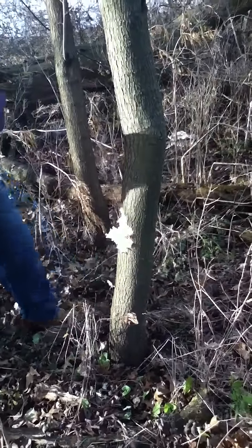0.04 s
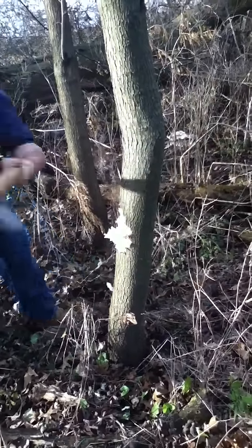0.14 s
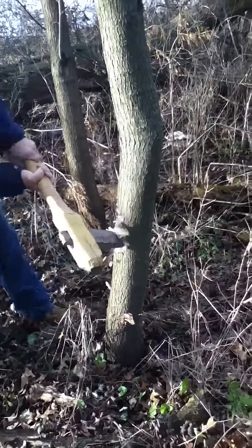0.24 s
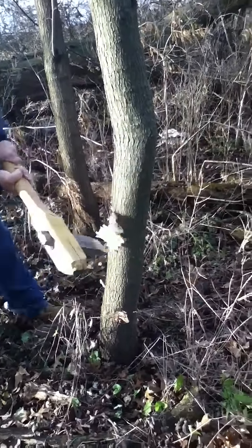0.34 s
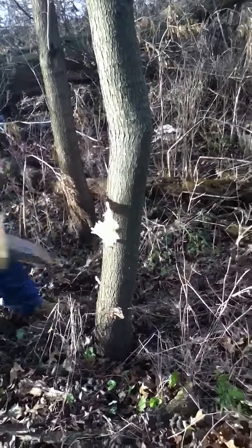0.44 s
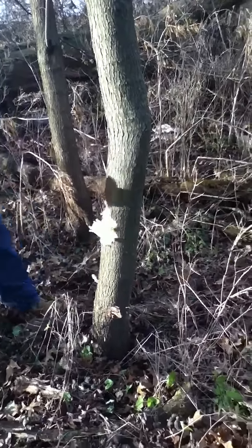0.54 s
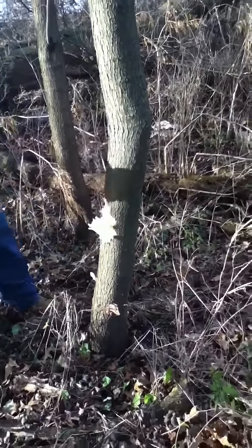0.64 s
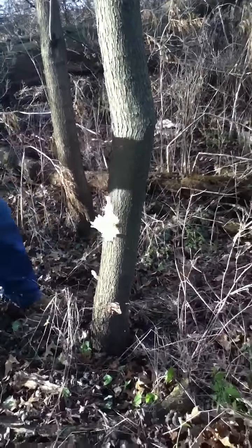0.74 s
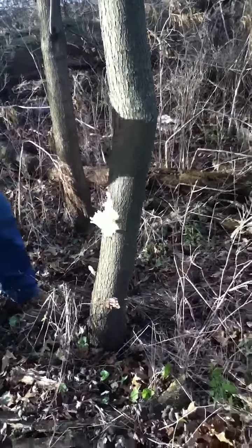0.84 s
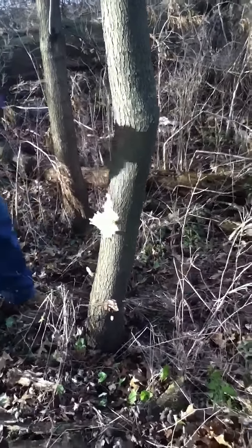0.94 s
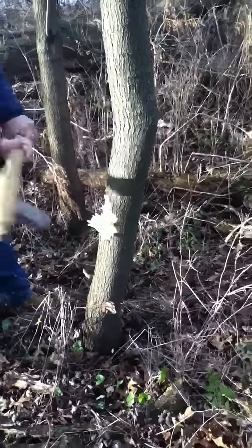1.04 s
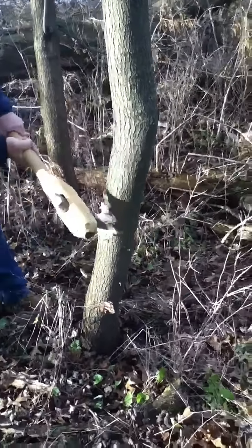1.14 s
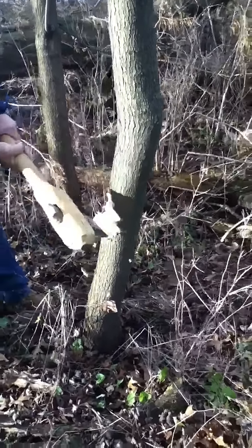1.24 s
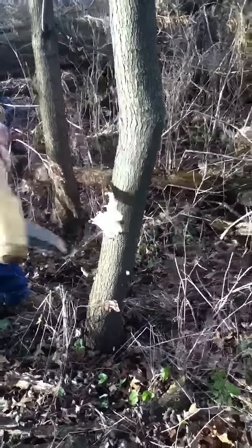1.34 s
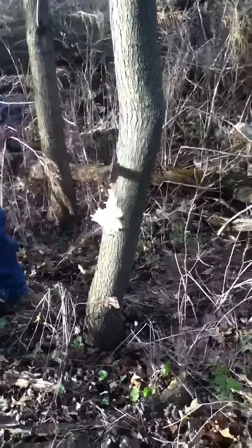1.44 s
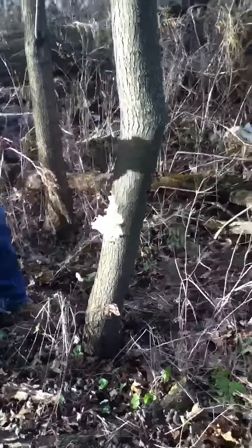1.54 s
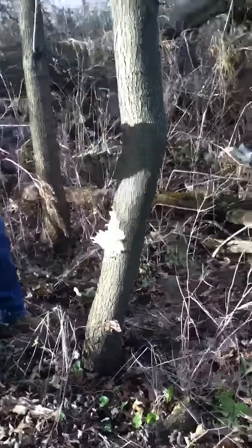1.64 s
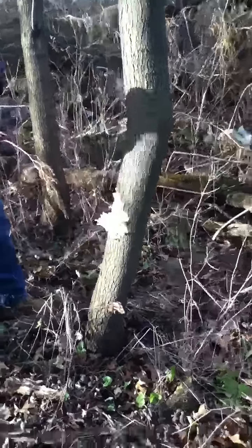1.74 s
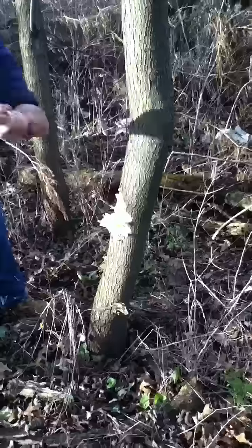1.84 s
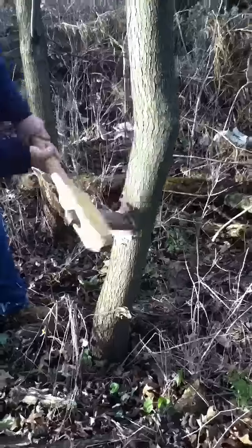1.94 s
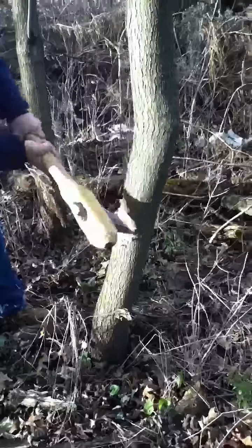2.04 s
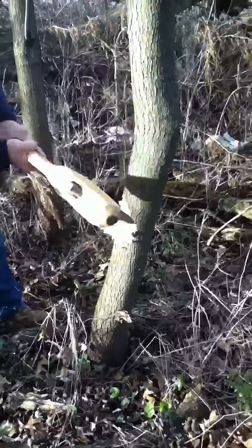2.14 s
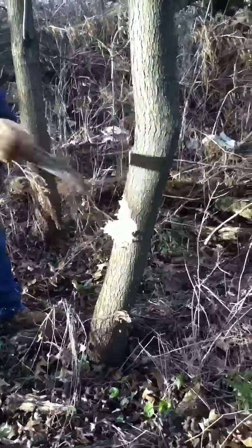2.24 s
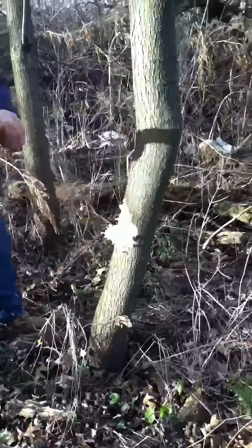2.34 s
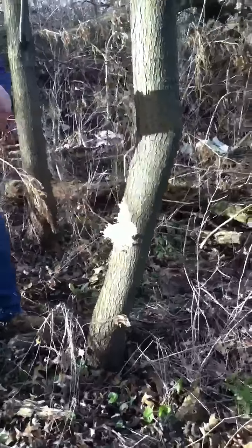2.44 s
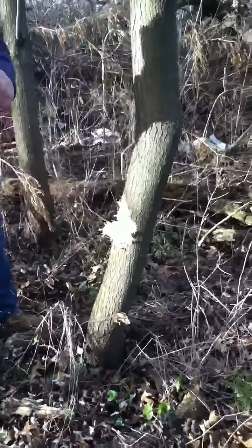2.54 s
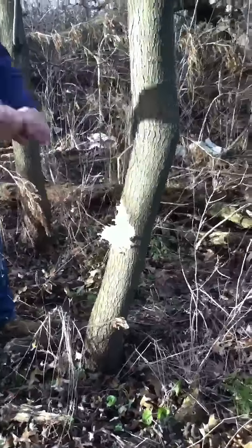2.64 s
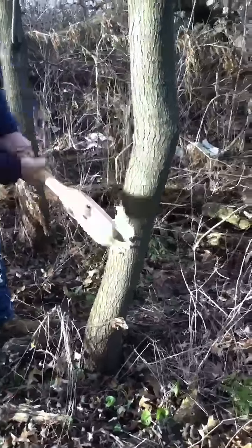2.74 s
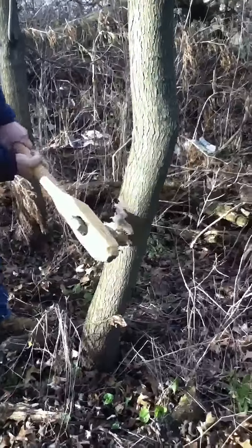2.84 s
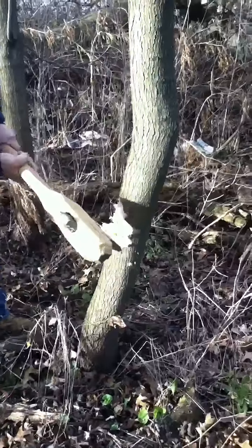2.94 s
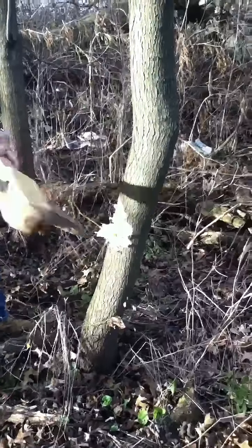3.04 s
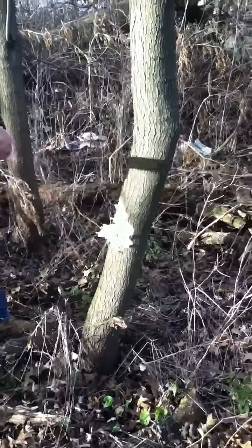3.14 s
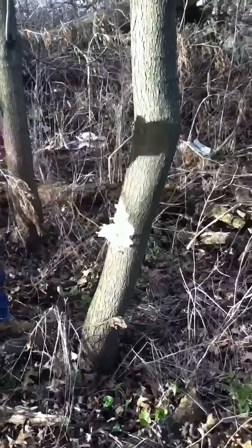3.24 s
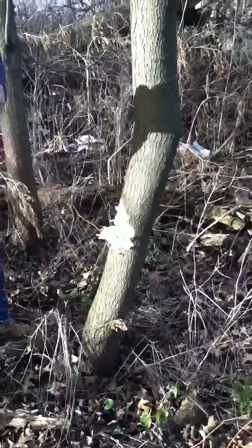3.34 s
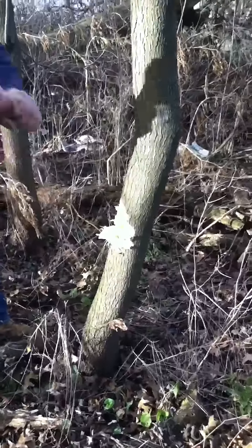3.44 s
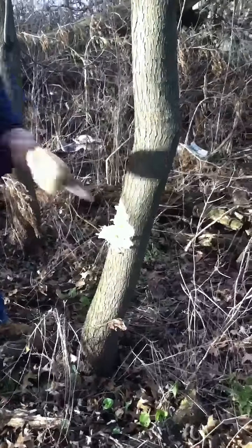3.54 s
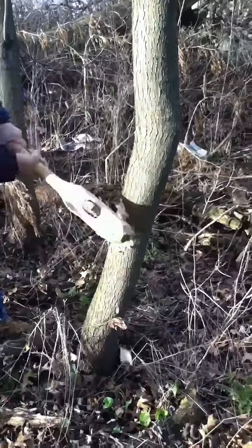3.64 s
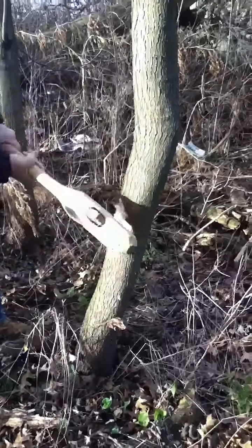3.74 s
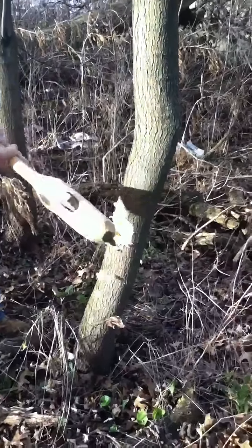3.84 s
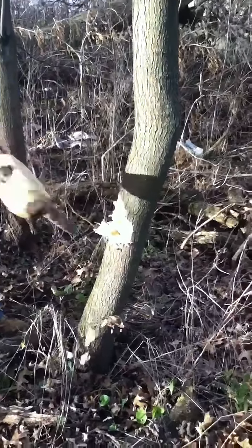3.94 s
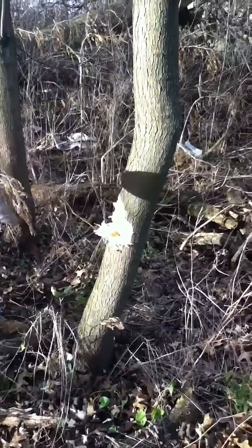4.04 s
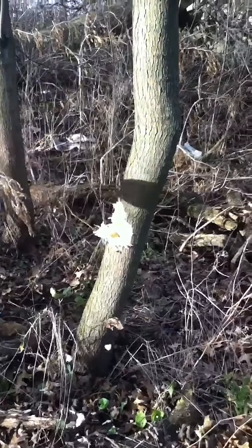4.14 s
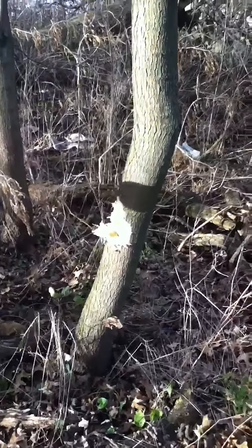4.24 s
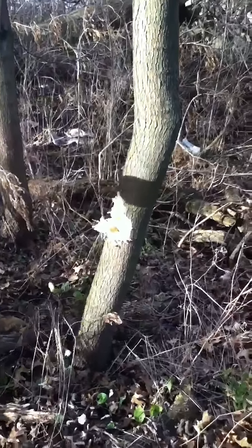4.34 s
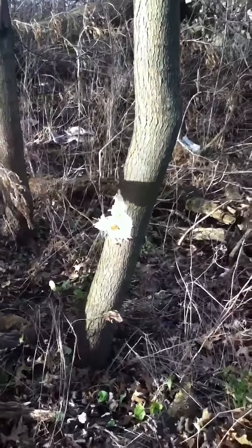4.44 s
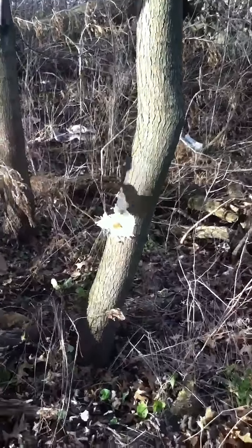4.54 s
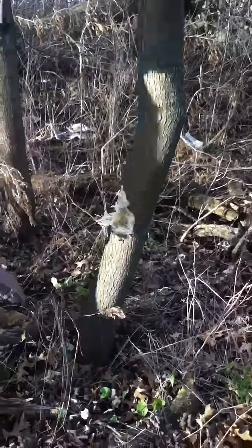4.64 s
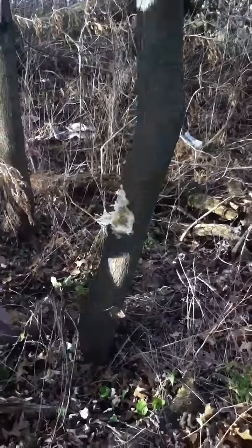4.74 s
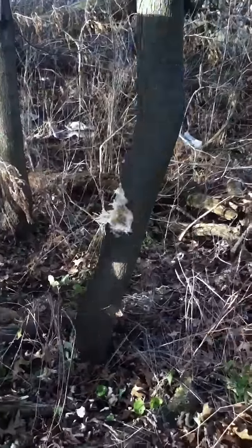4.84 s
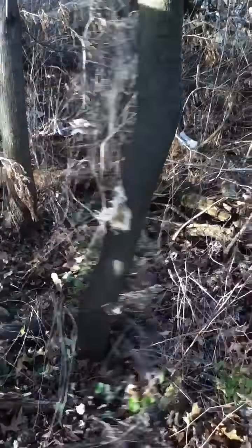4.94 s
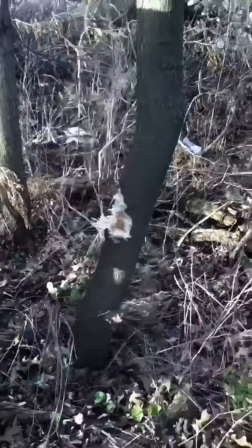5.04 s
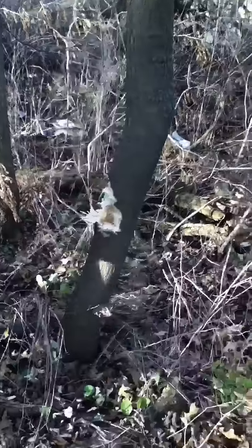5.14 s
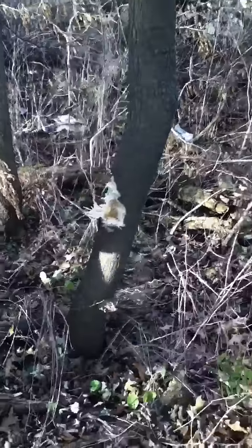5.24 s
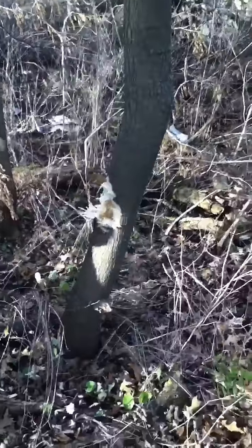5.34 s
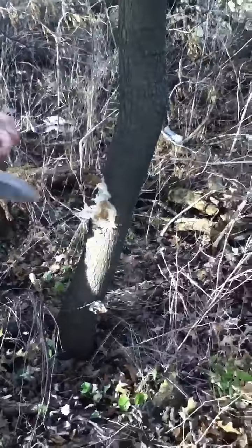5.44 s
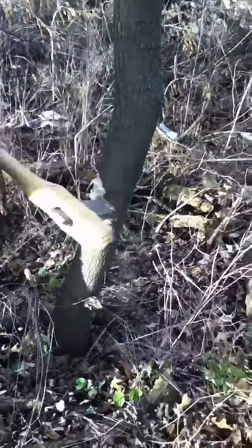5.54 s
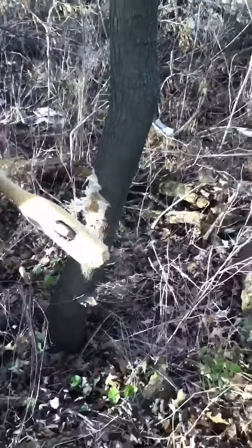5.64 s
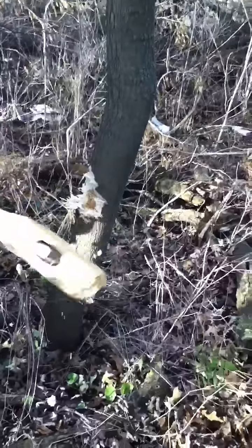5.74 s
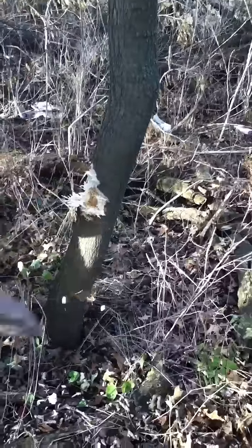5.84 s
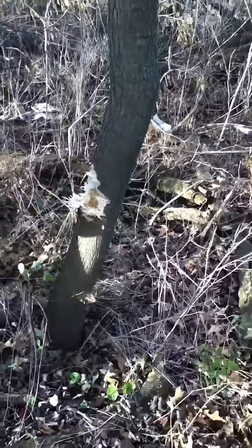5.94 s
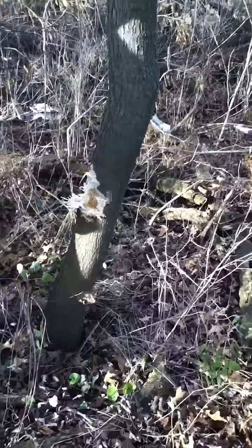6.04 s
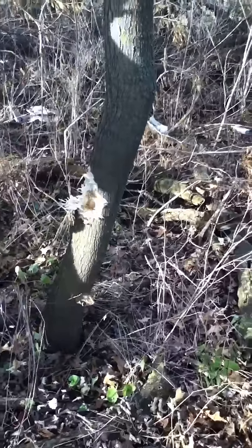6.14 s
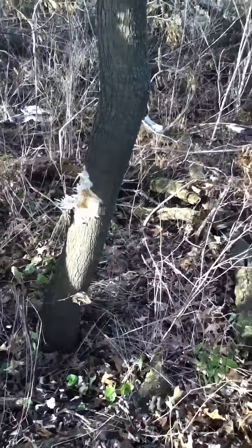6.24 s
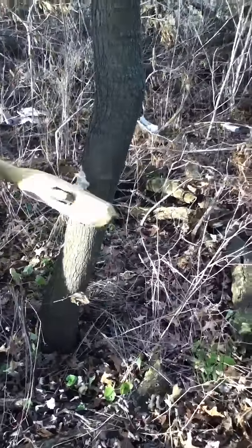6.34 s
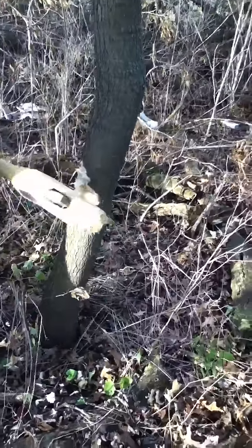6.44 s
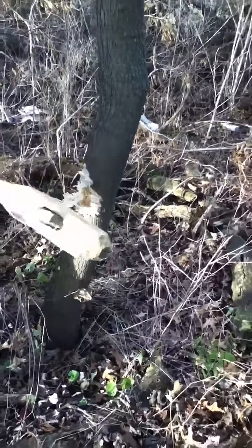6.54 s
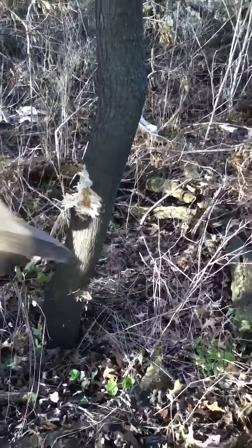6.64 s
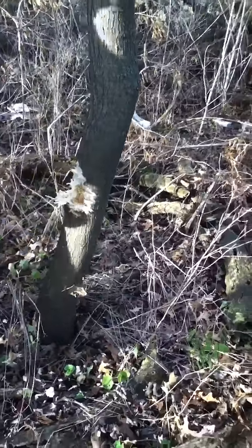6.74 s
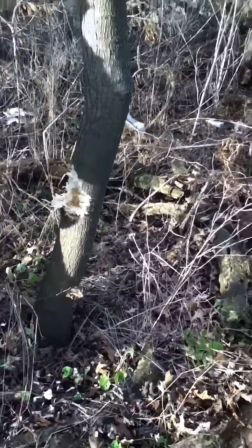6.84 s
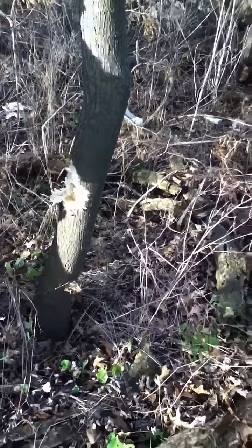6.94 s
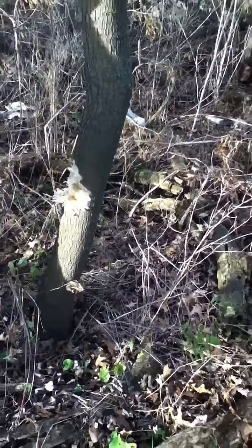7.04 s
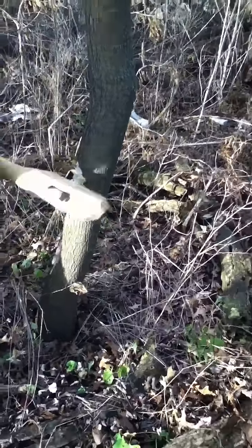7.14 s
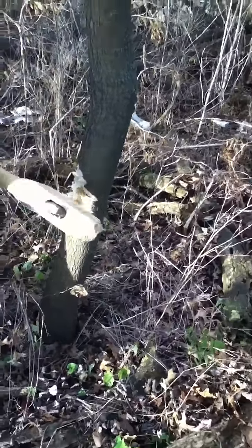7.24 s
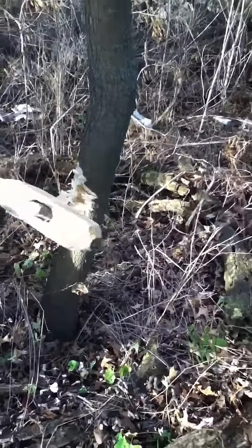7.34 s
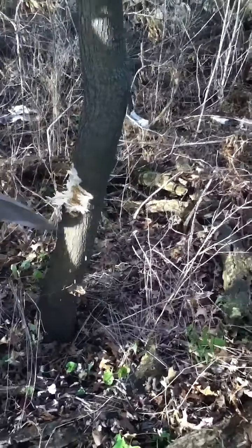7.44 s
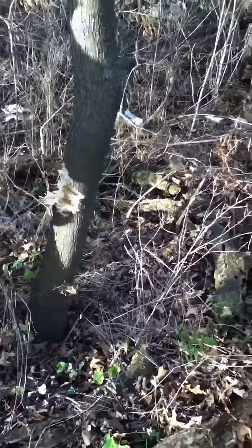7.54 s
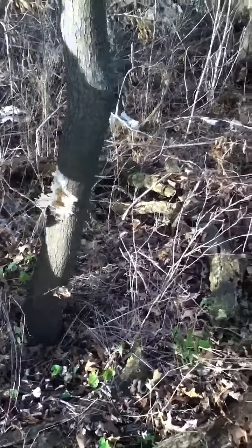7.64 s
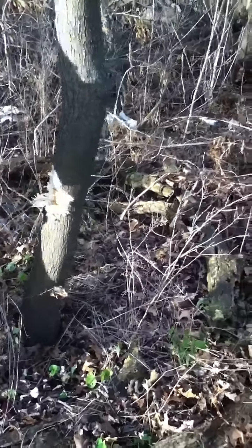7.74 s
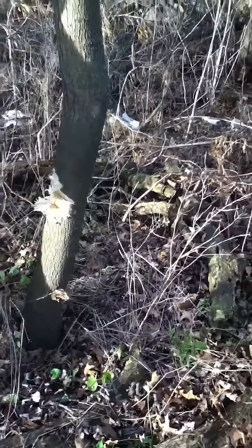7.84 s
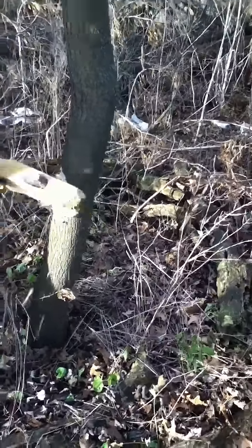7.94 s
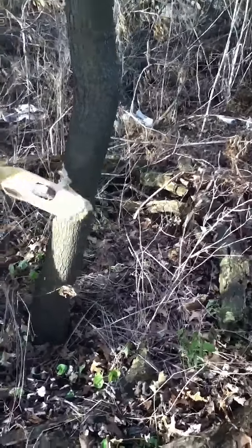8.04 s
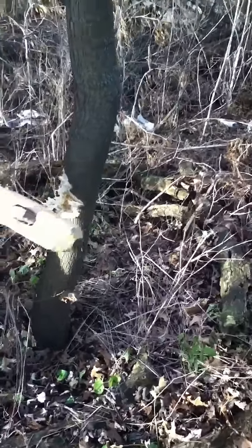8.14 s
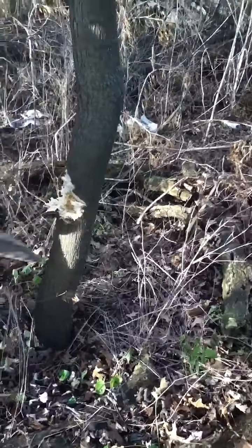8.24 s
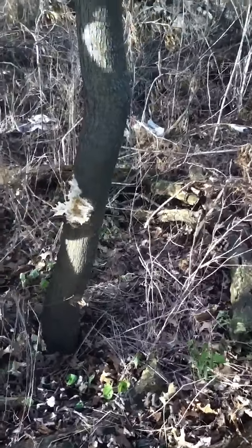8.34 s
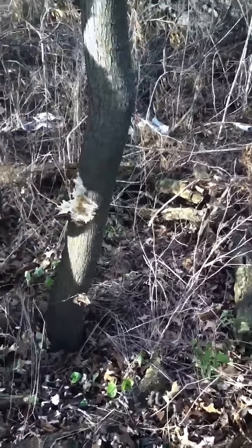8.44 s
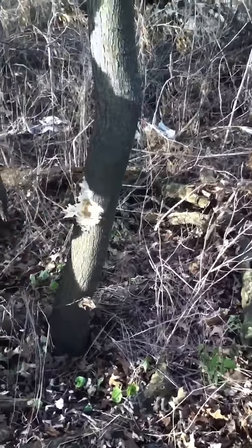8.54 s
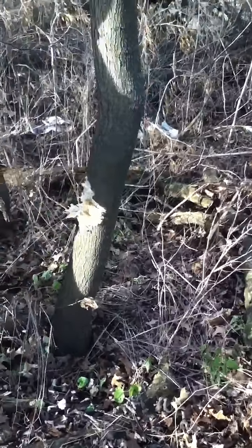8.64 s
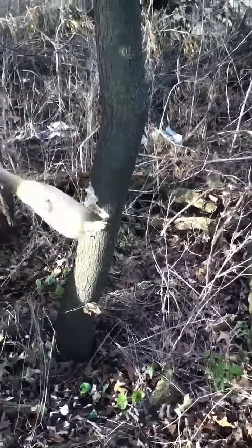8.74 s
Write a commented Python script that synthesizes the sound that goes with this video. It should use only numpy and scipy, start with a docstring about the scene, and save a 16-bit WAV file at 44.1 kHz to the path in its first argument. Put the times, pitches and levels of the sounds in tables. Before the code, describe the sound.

A stone axe strikes a slim living tree a couple of metres away in still woodland. Five sharp, dead knocks come a little faster than one a second, each with a crunch of fibres and a faint echo. In a short pause there is a rustling swish, a twig snap and a soft boot thud, then four more blows follow. Chips patter lightly into dry leaves.

```python
"""A smooth, finely crackling rustle swishes in still winter woodland air as a chopper moves; boots thud.
A couple of metres away, his stone axe in a wooden haft strikes a slim living trunk nine times.
Each impact excites heavily damped modes, a dead knock, while fibres crunch and the trunk shudders.
The trees around reflect faint echoes, and faint woody pings and taps come mostly just after the blows.
Chips patter into the leaf litter, twigs snap underfoot, and a limiter holds the peaks."""
import sys
import numpy as np
from scipy import signal
from scipy.fft import rfft, irfft, next_fast_len
from scipy.io import wavfile
from scipy.ndimage import uniform_filter1d, minimum_filter1d

SR = 44100
rng = np.random.default_rng(int(sys.argv[2]) if len(sys.argv) > 2 else 0)


def persist_wave(psi):
    """Save psi, clipped to +-1, as 16-bit WAV."""
    counts = np.round(np.clip(psi, -1, 1) * 32767).astype(np.int16)
    wavfile.write(sys.argv[1], SR, np.atleast_2d(counts).T)


N = 387198

# axe blows: start_s, three knock modes (pitch_hz, level_db, cycles_to_peak),
# hollow note (pitch_hz, level_db), second bite (lag_ms, gain_db), crunch (level_db, centre_ms, spread_ms),
# stone modes (low_mode_db, high_mode_db), shudder_gain_db
BLOWS = [(0.3617, [(690, -4, 0.44), (944, -22, 2.6), (1460, 12, 0.56)], (247, -25.5), (1.92, -20.5),
         (-18.5, 0.78, 1.75), (-40, -32), 1.5), (1.214, [(656, -16.5, 0.39), (905, -15.5, .6),
         (1516, -7.7, 0.83)], (221, -25.5), (1.177, 4), (-24.5, 1.95, 1.9), (-36.5, -27.5), -1),
         (2.059, [(530, -9, 0.37), (800, -9, 0.64), (1540, -2.5, 0.48)], (200, -27.5), (1.94, -14.7),
         (-22, 1.5, 2.8), (-43, -34), 2), (2.8834, [(634, -10.5, 0.63), (1360, -8, 2), (1946, -12, 2.2)],
         (244, -19), (1.8, -2.5), (-19, -0.43, 2.4), (-22, -24), 4.5), (3.7111, [(824, -14, 0.61),
         (1273, -15, 2.2), (1796, -13.5, 2.7)], (220, -24.5), (1.87, -9.5), (-19, 2.2, 3), (-23, -18),
         -5.5), (5.6511, [(472, -17, 0.9), (787, -12.5, 2), (1310, -10, 1.4)], (205, -22), (1.93, 4.3),
         (-15, 2, 2), (-27, -4), 4.5), (6.47, [(508, -14, 1.1), (866, 1.5, 0.56), (1452, -7, 1.03)],
         (204, -22), (2.57, -10), (-22, 4.3, 2.3), (-15, -1.2), 6.5), (7.2666, [(406, -7, 0.35),
         (895, 0.5, 0.89), (1260, -1, 0.7)], (220, -22.5), (1.5, -7.5), (-25.5, 2.9, 2.1), (-21, -14), 4),
         (8.0519, [(465, 2, 0.45), (990, -2, 0.82), (1460, -6.5, 1.06)], (239, -19), (1.39, -6.5),
         (-19.5, 4, 2.9), (-19, -7.5), 1.5)]


def undb(db):
    """Decibels to amplitude ratio."""
    return 10 ** (np.asarray(db) / 20)


def unit(x):
    """Normalise to rms 1."""
    return x / np.sqrt(np.mean(x ** 2))


def peak(x, db):
    """Normalise to a given peak level."""
    return undb(db) * x / np.max(np.abs(x))


def add(out, at, sound):
    """Superpose a sound from a given second on."""
    i = max(int(at * SR), 0)
    out[i:i + len(sound)] += sound[:max(len(out) - i, 0)]


def colour(x, points):
    """Minimum-phase filter through (frequency_hz, gain_db) points."""
    size = next_fast_len(len(x) + 4096)
    hz, db = np.transpose(points)
    bin_hz = np.arange(size // 2 + 1) * SR / size
    log_gain = np.log(undb(np.interp(np.log(bin_hz + 1), np.log(hz), db)))
    cepstrum = irfft(log_gain, size)
    cepstrum[1:size // 2] *= 2  # folding the cepstrum makes the filter causal
    cepstrum[size // 2 + 1:] = 0
    return irfft(rfft(x, size) * np.exp(rfft(cepstrum)), size)[:len(x)]


def noise(points, size):
    """Filtered Gaussian noise of rms 1."""
    return unit(colour(rng.standard_normal(size), points))


def drift(rate_hz):
    """Linearly interpolated random values of rms 1."""
    hold = max(int(SR / rate_hz), 1)
    stairs = np.repeat(rng.standard_normal(N // hold + 1), hold)
    return unit(uniform_filter1d(stairs, hold)[:N])


def swell(t, peak_s):
    """Critically damped envelope: rises from t = 0 to 1 at peak_s, then decays."""
    u = np.maximum(t, 0) / peak_s
    return u * np.exp(1 - u)


def ring(t, modes):
    """Superposition of damped modes (pitch_hz, level_db, peak_s), neighbours in opposite polarity."""
    return sum((-1) ** k * undb(db) * swell(t, peak_s) * np.sin(2 * np.pi * hz * t)
               for k, (hz, db, peak_s) in enumerate(modes))


def air(hiss_db=-61, waver_db=1.2, rumble_db=-65.5, gust_db=3):
    """Amplitude-modulated noise: a soft, nearly even hiss over an unsteady low rumble."""
    # spectrum of still woodland air: frequency_hz, gain_db
    hiss_spectrum = [(25, -36), (76, 7), (157, 0.5), (405, -6), (1500, -10), (2220, -10), (3160, -25),
                     (16000, -41.5)]
    rumble = noise([(25, 4.0), (70, 1.0), (130, -17.0), (300, -25.0), (2000, -38.5)], N)
    hiss = undb(hiss_db + waver_db * drift(1.2)) * noise(hiss_spectrum, N)
    return hiss + undb(rumble_db + gust_db * drift(11)) * rumble


def rustle_envelope(body=False, rest_db=-56, blow_db=-52.5, blow_peak_s=0.059, edge_db=9, roundness=1.49):
    """Incoherent sounds add in power: a resting level, a swell at each blow and one at each movement."""
    # swishes as the chopper moves: centre_s, level_db, rise_s, fall_s, body_gain_db
    swishes = [(0.116, -25.5, 0.072, 0.062, -0.5), (0.329, -45.5, 0.11, 0.096, -1),
               (0.957, -46, 0.28, 0.047, 5), (1.053, -44, 0.078, 0.077, -6), (1.76, -53, 0.19, 0.39, 10.5),
               (3.343, -49, 0.029, 0.027, -6), (4.232, -45, 0.18, 0.15, -26),
               (4.464, -35.5, 0.12, 0.065, 1.5), (4.631, -31, 0.043, 0.072, -1),
               (4.757, -27, 0.15, 0.061, -2.5), (5.059, -32, 0.13, 0.096, 5.5),
               (5.211, -43.5, 0.035, 0.077, 13), (5.375, -38.5, 0.095, 0.1, 5), (5.49, -42, 0.073, 0.12, 8),
               (6.568, -51.5, 0.32, 0.2, 13), (6.87, -45, 0.098, 0.14, 9.5), (7.49, -44.5, 0.06, 0.17, 8.5),
               (7.95, -32, 0.12, 0.064, -2.5)]
    t = np.arange(N) / SR
    blow_power = sum((undb(blow_db) * swell(t - at, blow_peak_s)) ** 2 for at, *_ in BLOWS)
    power = undb(rest_db) ** 2 + blow_power
    for at, db, rise_s, fall_s, body_db in swishes:
        away = np.abs(t - at) / np.where(t < at, rise_s, fall_s)
        drop_db = edge_db * np.minimum(away, 10) ** roundness  # roundness 1 is pointed, 2 a bell
        power += undb(db + body * body_db - drop_db) ** 2
    return np.sqrt(power)


def rustle(crackles_per_s=800, crackle_s=0.00091, grain_db=8, crackle_db=-4.5, body_hz=662, flutter_db=1):
    """Modulated broadband noise: a smooth rustling swish as the chopper moves, with fine crackles."""
    # spectrum of the rustle: frequency_hz, gain_db
    spectrum = [(88, -11), (400, -15), (1000, -7.5), (1400, -7), (3300, -1.5), (6000, -1.5), (10000, -3.5),
                (16000, -14.5)]
    onsets = rng.random(N) < crackles_per_s / SR
    impulses = onsets * undb(grain_db * np.minimum(rng.exponential(size=N), 3.2))
    decays = signal.lfilter([1], [1, -np.exp(-1 / (crackle_s * SR))], impulses)
    crackle = unit(decays * rng.standard_normal(N))
    swish = unit(colour(rng.standard_normal(N) + undb(crackle_db) * crackle, spectrum))
    # the brightness drifts by about 2 dB
    dull = signal.sosfilt(signal.butter(1, 4000, fs=SR, output="sos"), swish)
    swish = dull * undb(2 * drift(4.7)) + (swish - dull)
    body = signal.sosfilt(signal.butter(1, body_hz, fs=SR, output="sos"), swish)
    shaped = (swish - body) * rustle_envelope() + body * rustle_envelope(body=True)
    return shaped * undb(flutter_db * drift(110))


def chips_and_twigs(grain_db=4, settle_db=-49, settle_count=50, chip_db=-48, flight_s=0.045, scatter_s=0.26):
    """Impact and fracture radiate decaying noise bursts: chips land, twigs snap, trodden litter settles."""
    # the clearest landings and snaps: start_s, level_db, treble_db, decay_s
    clear_ticks = [(.224, -29.5, -14, 0.00067), (.524, -43, -10, 0.0069), (1.119, -38, 2, .003),
                   (1.774, -36, -17, 0.0012), (3.2913, -36, -14, 0.0045), (3.8933, -32.5, -12, 0.0092),
                   (3.9609, -33, -7.5, 0.01), (4.193, -35.5, -10, 0.009), (4.2878, -33, -6, 0.0027),
                   (4.329, -33.5, -11, 0.0046), (4.8092, -13, 4, 0.0015), (4.819, -16.5, 0, 0.0022),
                   (4.833, -26.5, 7, 0.0022), (5.5432, -24.5, -3, 0.0011), (5.550, -30, -2, 0.0017),
                   (5.8848, -31.5, -6.5, 0.0015), (6.097, -40, -12, 0.017), (6.5171, -28.5, -11, 0.0028),
                   (6.5863, -35, -7.5, 0.017), (7.3825, -32.5, -3, 0.0071), (7.6356, -38, -6, 0.0036),
                   (8.206, -32, -5, 0.0033), (8.2572, -40, -4, 0.01)]
    # spectrum of a tick: frequency_hz, gain_db
    spectrum = [(200, -14), (900, -12), (5000, 5.5), (10000, 6.5), (16000, -6)]
    t = np.arange(SR // 12) / SR
    settling = [(when * N / SR, settle_db + 6 * (size - .5), -8, .0012)
                for when, size in rng.random((settle_count, 2))]
    chips = [(at + flight_s + scatter_s * late, chip_db, -44, 0.003)
             for at, *_ in BLOWS for late in rng.random(size=3)]
    out = np.zeros(N)
    for at, db, treble_db, decay_s in list(clear_ticks) + chips + settling:
        grains = rng.standard_normal(len(t)) * undb(grain_db * rng.standard_normal(len(t)))
        crackle = unit(colour(colour(grains, spectrum), [(3000, 0.021), (9000, treble_db)]))
        add(out, at, undb(db) * crackle * np.exp(-t / decay_s))
    return out


def steps():
    """A soft contact excites mainly low frequencies: boots thud on yielding ground."""
    # shifts of weight: start_s, peak_db, peak_s
    footfalls = [(0.245, -38.5, 0.0085), (1.735, -38.5, 0.018), (5.061, -27.5, 0.0023)]
    # spectrum of a thud: frequency_hz, gain_db
    spectrum = [(30, 6), (85, 20), (300, -15), (1000, -24.5), (3000, -41)]
    t = np.arange(SR // 4) / SR
    out = np.zeros(N)
    for at, db, peak_s in footfalls:
        add(out, at, peak(swell(t, peak_s) * noise(spectrum, len(t)), db))
    return out


def axe(splinter_db=-16, splinter_s=0.0023, radiate_hz=280, crack_db=-26, crack_s=0.0002, lead_s=.012):
    """Impact excites modes of wood and stone; where the blunt edge lands sets their pitch and damping."""
    # low bending modes of the trunk, the higher slower to build: pitch_hz, level_db, peak_s
    bending_modes = [(79.5, -38, 0.008), (124.7, -44, 0.021)]
    # modes of the stone head in its socket: pitch_hz, peak_s
    stone_modes = [(2464, 0.0014), (4460, 0.00038)]
    # spectrum of tearing fibres: frequency_hz, gain_db
    crunch_spectrum = [(300, -37), (1200, 11), (4200, 1.5), (7000, -6), (11000, -8), (16000, -20.5)]
    # spectrum of the first fibres snapping at contact: frequency_hz, gain_db
    crack_spectrum = [(1500, -12), (6000, 0), (16000, -4.5)]
    t = np.arange(SR // 3) / SR - lead_s
    # a slim trunk radiates little of the knock's bass
    radiation = signal.butter(2, radiate_hz, "highpass", fs=SR, output="sos")
    out = np.zeros(N)
    for at, modes, (hollow_hz, hollow_db), (lag_ms, bite_db), fibres, stone_db, shudder_db in BLOWS:
        # the edge bites twice, and green wood damps each knock within a few cycles
        knock = [(hz, db, cycles / hz) for hz, db, cycles in modes]
        second_bite = undb(bite_db) * ring(t - lag_ms / 1000, knock)
        wood = signal.sosfilt(radiation, ring(t, knock) + second_bite)
        hollow = ring(t - 0.0014, [(hollow_hz, hollow_db, 0.0031)])
        shudder = undb(shudder_db) * ring(t, bending_modes)
        # fibres crush while the edge sinks in, and a few splinter afterwards
        crunch_db, centre_ms, spread_ms = fibres
        crushing = np.exp(-.5 * ((t * 1000 - centre_ms) / spread_ms) ** 2)
        splintering = undb(splinter_db) * swell(t, splinter_s)
        crunch = undb(crunch_db) * (crushing + splintering) * noise(crunch_spectrum, len(t))
        crack = undb(crack_db) * swell(t, crack_s) * noise(crack_spectrum, len(t))
        stone = ring(t - .0004, [(hz, db, peak_s) for (hz, peak_s), db in zip(stone_modes, stone_db)])
        add(out, at - lead_s, wood + hollow + shudder + crack + crunch + stone)
    return out


def woodland_echoes(blows, knock_db=-17, clap_db=26, near_t60_s=0.44, far_t60_s=2.7):
    """Diffuse reflection: the ground, a bank, single trunks and the wood beyond scatter each blow back."""
    # reflections from nearby trunks: delay_s, gain_db, spread_s
    echoes = [(.055, -33, .005), (.095, -43.5, .0032), (.128, -38.5, .0063), (.303, -40.5, .008)]
    # spectra of the four return paths: frequency_hz, gain_db
    ground_spectrum = [(220, -15.5), (420, 9), (1500, -3), (5000, -26)]
    bank_spectrum = [(90, -8.5), (200, 3), (650, -5), (1600, -13), (16000, -44.5)]
    trunk_spectrum = [(200, -20.5), (1000, -4), (2200, 2), (4200, -10.5), (16000, -30.5)]
    tail_spectrum = [(300, -11), (700, -1), (2200, -4), (4200, -24), (16000, -32.5)]
    t = np.arange(SR) / SR
    # summed over all directions, a blow is a broad clap with only a hint of its knock's pitch
    radiated = undb(knock_db) * blows
    for at, *_ in BLOWS:
        add(radiated, at, undb([clap_db]))

    def scatter(envelope, db):
        """Dense random reflections merge into noise of a given total energy."""
        return undb(db) * rng.standard_normal(len(t)) * envelope / np.sqrt(np.sum(envelope ** 2))

    ground = scatter(swell(t - .002, peak_s=0.0027), db=-16.5)
    bank = scatter(swell(t - .002, peak_s=0.0092), db=-17)
    trunks = sum(scatter(np.exp(-.5 * ((t - delay) / spread) ** 2), db) for delay, db, spread in echoes)
    tail = sum(scatter((t > .015) * undb(-60 * t / t60_s), db)
               for db, t60_s in [(-26, near_t60_s), (-34, far_t60_s)])
    response = (colour(ground, ground_spectrum) + colour(bank, bank_spectrum)
                + colour(trunks, trunk_spectrum) + colour(tail, tail_spectrum))
    return signal.fftconvolve(radiated, response)[:N]


def woody_pings(vary_db=2):
    """Resonance: short noise bursts excite three damped modes, in a different balance each time."""
    # faint woody pings and taps, mostly just after the blows: start_s, peak_db, chatter_s
    taps = [(.486, -36, .002), (1.643, -35, 0.00069), (2.246, -40.5, 0.0033), (2.303, -44, 0.0045),
            (5.7, -31, .0039), (5.772, -38.5, 0.007), (5.851, -37.5, 0.0037), (5.983, -44, 0.0057),
            (6.769, -37, 0.0026), (7.2153, -36, 0.00052)]
    # modes of a ping: pitch_hz, level_db, peak_s
    ping_modes = [(1405, 2, 0.00038), (2160, -2, 0.0025), (2750, -0.5, 0.00042)]
    t = np.arange(SR // 16) / SR
    out = np.zeros(N)
    for at, db, chatter_s in taps:
        modes = [(hz, mode_db + vary_db * rng.standard_normal(), peak_s) for hz, mode_db, peak_s in ping_modes]
        chatter = swell(t, chatter_s) * rng.standard_normal(len(t))
        add(out, at, peak(signal.fftconvolve(chatter, ring(t, modes)), db))
    return out


def scene():
    """Linear superposition of the chopping, its echoes and the small sounds around it, in one channel."""
    blows = axe()
    return (blows + woodland_echoes(blows) + woody_pings() + chips_and_twigs() + rustle() + steps() + air())[None]


def record(dry, ceiling=0.7, low_cut_hz=62, top_hz=15900):
    """Band and peak limiting: the microphone thins the bass, a limiter holds the knocks, the top is cut."""
    thin = signal.sosfilt(signal.butter(2, low_cut_hz, "highpass", fs=SR, output="sos"), dry)
    window = SR // 1500  # about 0.7 ms of look-ahead
    gain = np.minimum(1, ceiling / (np.abs(thin) + 1e-9))
    limited = thin * uniform_filter1d(minimum_filter1d(gain, window), window)
    return signal.sosfilt(signal.ellip(10, .2, 80, top_hz, fs=SR, output="sos"), limited)


dry = scene()
out = record(dry)
persist_wave(out)
```